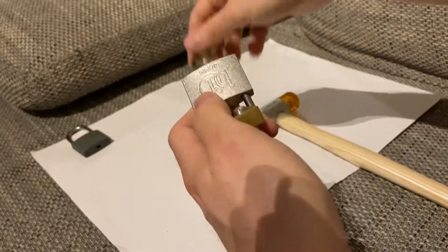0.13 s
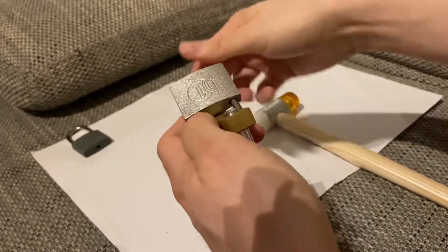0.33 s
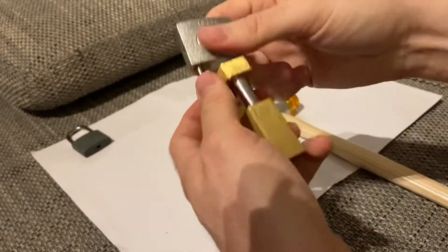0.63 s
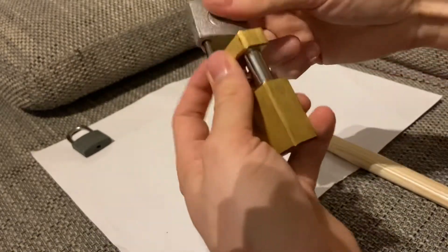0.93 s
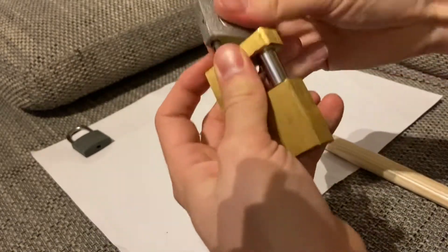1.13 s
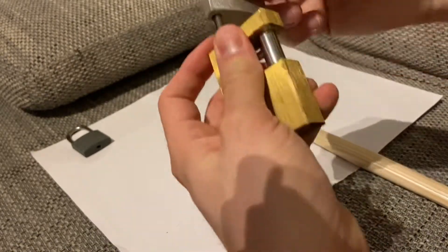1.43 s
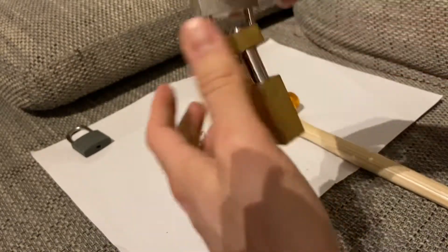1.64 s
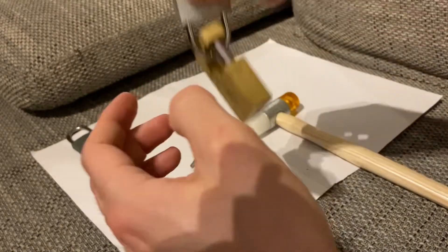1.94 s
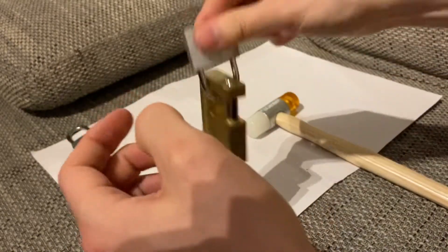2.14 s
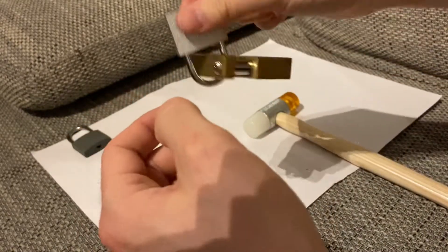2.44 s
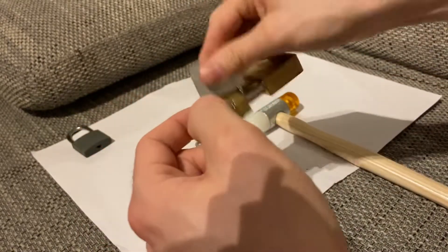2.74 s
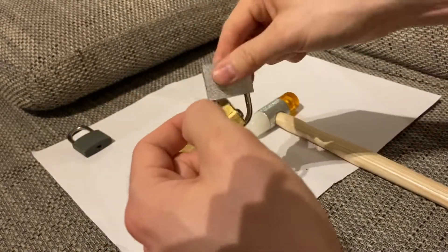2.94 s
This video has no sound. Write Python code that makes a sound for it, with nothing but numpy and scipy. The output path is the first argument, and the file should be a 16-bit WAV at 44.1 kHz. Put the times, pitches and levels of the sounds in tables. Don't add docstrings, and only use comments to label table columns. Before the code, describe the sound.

Linked padlocks are handled over a sofa; a muffled landing and thin jingle, a few dry damped ticks, then sharp irregular shackle clicks. Close stereo microphone, short room tail, faint low rumble.

```python
import sys
import numpy as np
from scipy import signal
from scipy.fft import rfft, irfft, next_fast_len
from scipy.io import wavfile
from scipy.ndimage import map_coordinates

SR = 44100
rng = np.random.default_rng(int(sys.argv[2]) if len(sys.argv) > 2 else 0)


def store_wav(level_fs):
    pcm = np.round(np.clip(np.atleast_2d(level_fs), -1, 1) * 32767)
    wavfile.write(sys.argv[1], SR, pcm.T.astype(np.int16))


def undo_db(level):
    steps = np.asarray(level, float) / 20
    return 10 ** steps


N = 136710


def unit(x):
    return x / np.sqrt(np.mean(x ** 2) + 1e-20)


def along(points, hz):
    f, v = np.transpose(points)
    return np.interp(np.log(hz + 1), np.log(f + 1), v)


def curve(rows):
    return undo_db(np.interp(np.arange(N) / SR, *np.transpose(rows)))


def wobble(rate, size=N):
    knots = rng.standard_normal(int(size * rate / SR) + 4)
    return map_coordinates(knots, [np.arange(size) * rate / SR])


def filtered(x, response):
    m = next_fast_len(x.shape[-1] + 8192)
    spectrum = rfft(x, m) * response(np.fft.rfftfreq(m, 1 / SR))
    return irfft(spectrum, m)[..., :x.shape[-1]]


def noise(colour, size=N):
    return unit(filtered(rng.standard_normal(size), lambda hz: undo_db(along(colour, hz))))


def burst(colour, t, spike):
    crack_t60_s = .004
    push = rng.standard_normal(len(t)) * undo_db(-60 * t / crack_t60_s)
    push[26] += spike
    sound = filtered(push, lambda hz: undo_db(along(colour, hz)))
    return sound / np.abs(sound).max()


def ring(modes, t):
    rattle_db, rattle_rate, rattle_grows_s = 6, 300, .012
    total = np.zeros(len(t))
    for hz, db, t60 in modes:
        rattle = rattle_db * wobble(rattle_rate, size=len(t)) * (1 - np.exp(-t / rattle_grows_s))
        tone = np.sin(2 * np.pi * hz * rng.normal(1, .003) * t)
        total += undo_db(db + rattle - 60 * t / t60) * tone
    return total


def clicks(rows, low, high):
    # frequency in Hz, level in dB
    crack_colour = [(1200, -25), (3000, -13.5), (5000, 2), (7000, 1), (10000, 1), (15500, -2), (16800, -46)]
    knock_colour = [(200, -12.5), (600, -8.5), (1200, -3), (2500, 2.5), (4000, 0.5), (8000, -43)]
    spark_colour = [(7000, -30), (11500, 0), (14000, -1), (16700, -24)]
    spark_db, knock_gain_db, thud_db, scatter_db = -0.5, 5, -1, -5.5
    knock_t60_s, scatter_t60_s, onset_s = .015, .022, .00049
    out = np.zeros((2, N + SR))
    t = np.arange(SR // 4) / SR
    for s, db, knock_db, low_db, high_db in rows:
        spike = np.clip(-.14 * knock_db, 1, 6)
        edge_db = -19 - .29 * knock_db if len(high) else high_db
        edge = 2 * burst(spark_colour, t, spike) * undo_db(spark_db + edge_db)
        thud = noise(knock_colour, size=len(t)) * undo_db(thud_db - 60 * t / knock_t60_s)
        knock = undo_db(knock_db + knock_gain_db) * (2 * burst(knock_colour, t, spike) + thud)
        touch = 2 * burst(crack_colour, t, spike) + edge + knock
        scatter = noise(crack_colour, size=len(t)) * undo_db(scatter_db - 60 * t / scatter_t60_s)
        after = undo_db(low_db) * (scatter + ring(low, t)) + undo_db(high_db) * ring(high, t)
        hit = np.array([touch, after]) * (1 - np.exp(-t / onset_s))
        start = round(s * SR)
        out[:, start:start + len(t)] += undo_db(db) * hit
    return out[:, :N]


def shackles():
    # start in seconds, peak in dB, then
    # knock, body scatter with low ring, and high ring, all three in dB over the crack
    chain_contacts = [
        (1.7479, -15, -18, -23.5, -19),
        (1.751, -23.5, -11.5, -3.5, -32),
        (1.7544, -15.5, -18.5, -3, -9.5),
        (1.7936, -29.5, -33, -9.5, -26),
        (1.8041, -6, -28, -7.5, -5),
        (1.8398, -19.5, -35.5, -20, -23),
                      (2.0181, -25, -13.5, -12, 6.5), (2.022, -17, -40, -15.5, -15), (2.0335, -34, -13, -8, -8),
                (2.0555, -29.5, -30, -25, -15), (2.0608, -26.5, -17, -9, -23),
                (2.0735, -18.5, -26.5, -9, -14), (2.0782, -18, -21.5, -2.5, -3),
                (2.184, -49.5, -1.5, -10, -19), (2.2085, -14, -51.5, -28.5, -34),
                (2.2587, -19, -13.5, -7.5, -30), (2.263, -32.5, -27, -11.5, -29),
                (2.2832, -31.5, -40, -26, -27), (2.3045, -20.5, -11.5, -7, -1.5),
                (2.3462, -18, -54, -19, -9), (2.4057, -15, -19.5, -12, -2), (2.4437, -15.5, -17, -4, -9.5),
                      (2.524, -19.5, -39, -18.5, -14.5), (2.5574, -33.5, -8.5, -4, -18),
                (2.5699, -30.5, -14, -2.5, 5), (2.5734, -27.5, -10.5, -0.5, -6.5),
                (2.595, -8.5, -27, -12.5, -3.5), (2.722, -22, -11.5, -6.5, -16.5),
                (2.7262, -34.5, -18, -4, -14), (2.735, -26, -15, -7.5, -7), (2.7723, -24, -34.5, -18.5, -8),
                (2.8043, -25, -14, -2.5, -15), (2.809, -28, -15, -4.5, -15.5),
                (2.8484, -17.5, -32.5, -16.5, -18), (2.8799, -34.5, -8.5, -23.5, -20.5),
                (3.0241, -38, -20.5, -7.5, -18)]
    # frequency in Hz, level in dB, t60 in seconds
    low = [(4890, -1, .016), (4930, -24, .12), (4760, -6, .012), (5150, -7, .018), (6900, -6, .008),
           (8600, -6, .03), (8640, -24, .15)]
    high = [(13140, -4, .02), (13200, -27, .16), (13050, -28, .1), (11900, -10, .008), (15700, -10, .05)]
    return clicks(chain_contacts, low, high)


def loose_jingle():
    # start in seconds, peak in dB, then knock, body scatter with low ring, and high ring,
    # all three in dB over the crack
    contacts = [(0.0638, -66.5, -29.5, -9.5, -5.5), (0.0931, -40, -36, -5, 1),
                (0.1451, -65, -36.5, 11.5, 7.5), (0.170, -62, -35, 10.5, 6.5), (0.189, -62.5, -37, 8.5, 7),
                (0.2005, -54.5, -32.5, 8.5, 7), (0.2065, -57, -26, 10, 5), (0.2272, -29.5, -0.5, -6.5, -2),
                (0.2484, -38, -12, -2.5, 6), (0.2593, -29, 1, -8, 12.5), (0.2784, -36.5, -16, -6.5, 14.5),
                (0.2994, -43, -16, -1.5, 10.5), (0.332, -33, -28, -6, -2), (0.3821, -49.5, -18, -7.5, -1.5),
                (0.3953, -44.5, -0.5, 4.5, 1), (0.4794, -51.5, -5, -13, -12), (0.6695, -51, -9.5, 1.5, 3)]
    # frequency in Hz, level in dB, t60 in seconds
    low = [(5250, -16, .14), (10200, -20, .12), (7100, -20, .05)]
    high = [(14360, -1, .13), (14680, -8, .08), (14950, -11, .05), (15250, -14, .04), (13900, -14, .04)]
    return clicks(contacts, low, high)


def held_touches():
    # start in seconds, peak in dB, then knock, scatter and bright edge in dB over the crack
    contacts = [(0.5517, -41.5, -22, -4, -37), (0.5699, -22.5, -26.5, -12, -13.5),
                (0.885, -42.5, -21.5, -6.5, -41), (1.061, -64, -35, -22, 9), (1.0827, -86, -23, -11, 1),
                (1.1037, -50, -29, -1, 10), (1.1224, -44.5, -41, -19, -2.5), (1.175, -44, -16, -3, -19),
                (1.3241, -14.5, -36.5, -12, 0), (1.3408, -25, -27.5, -5.5, -14.5), (1.5396, -47, 0, 2, -8),
                (1.5538, -13.5, -48, -12, -9)]
    return clicks(contacts, [], [])


def body_clinks():
    # start in seconds, peak in dB, then knock, scatter with ring, and bright edge,
    # all three in dB over the crack
    contacts = [
        (0.2605, -26, -15.5, 6.5, -28),
        (0.2735, -40, -20, 11, -26.5),
        (0.2805, -33, -20.5, 7.2, -32),
    ]
    # frequency in Hz, level in dB, t60 in seconds
    body = [(4834, 2, .014), (4650, -6, .01), (7100, -10, .01)]
    return clicks(contacts, body, [])


def bumps():
    # start in seconds, level in dB
    landings = [
        (.229, -12.5),
        (0.233, -27.5),
        (0.262, -16),
        (.271, -23.5),
        (.292, -30),
        (0.329, -44),
        (0.396, -36),
        (.668, -46.5),
    ]
    # centre in Hz, width in Hz, level in dB
    cushion = [(94, 49, -4.5), (196.4, 36, 0), (590, 300, -8.5), (1050, 1400, -20)]
    blows = np.zeros(N)
    for s, db in landings:
        blows[round(s * SR)] = undo_db(db + 39.5)

    def body(f):
        total = 0
        for k, (centre, width, db) in enumerate(cushion):
            band = 1j * f * width / (centre * centre - f * f + 1j * f * width)
            total = total + (-1) ** k * undo_db(db) * band
        return total / (1 + 1j * f / 2500)

    return filtered(blows, body)


def grainy(colour):
    return unit(noise(colour) * undo_db(3 * wobble(60) + 3 * wobble(400)))


def paper_rustle():
    # time in seconds, level in dB
    level = [(.04, -84), (.1, -72), (.19, -82.5), (.225, -48.5), (.26, -29), (.31, -45), (.42, -56.5),
             (.55, -71), (.68, -60.5), (.8, -80)]
    # frequency in Hz, level in dB
    colour = [(59, -31.5), (100, 0), (1390, -17.5), (4980, -23), (9610, -21), (14700, -14), (15600, -17),
              (16200, -44)]
    return curve(level) * grainy(colour)


def skin_slide():
    # time in seconds, level in dB
    level = [(1.04, -88), (1.12, -61.5), (1.2, -76), (1.26, -98.5), (1.7, -99), (1.745, -61), (1.76, -82),
             (2.5, -68.5), (2.93, -74.5), (3, -64.5), (3.05, -76)]
    # frequency in Hz, level in dB
    colour = [(150, 2.5), (700, -9.5), (2500, -13.5), (6000, -14), (16000, -34.5)]
    return curve(level) * grainy(colour)


def room(x):
    # frequency in Hz, t60 in seconds
    decay = [(300, 0.39), (5000, 0.42), (14000, 0.33)]
    # frequency in Hz, level in dB
    colour = [(1000, 3.5), (5000, -0.5), (12000, -6.5), (15500, 4.5), (16300, -25)]
    room_db, delay_s = -13.5, .006
    out, step = np.zeros((2, N + SR)), SR // 12
    for start in range(0, N, step):
        hz, t, z = signal.stft(rng.standard_normal((2, SR // 2)), SR, nperseg=256)
        level = along(colour, hz)[:, None] - 60 * t / along(decay, hz)[:, None]
        tail = signal.istft(z * undo_db(level), SR, nperseg=256)[1]
        tail = tail / np.linalg.norm(tail[0])
        wet = signal.fftconvolve(x[None, start:start + step], tail, axes=1)
        out[:, start + round(delay_s * SR):][:, :wet.shape[1]] += wet
    return undo_db(room_db) * out[:, :N]


def background():
    # start in seconds, level in dB
    jolts = [
        (.13, -75),
        (.5, -64.5),
        (.98, -77),
        (1.159, -60),
        (1.329, -56),
        (1.8, -62),
        (2.05, -63),
        (2.277, -58.5),
        (2.58, -66.5),
        (2.8, -67),
    ]
    # frequency in Hz, level in dB
    rumble_colour = [(20, -35), (45, 9), (80, 0), (300, -11), (600, -44)]
    air_colour = [(150, -16.5), (300, 5), (700, -2), (2000, -41.5), (5000, -26), (15300, -5),
                  (16300, -57.5)]
    rumble_db, air_db = -71, -77.5
    hum_hz, hum_db, jolt_hz, jolt_rise_s = 489, -80, 62, .025
    t = np.arange(N) / SR
    hum = undo_db(hum_db + 2 * wobble(10)) * np.sin(2 * np.pi * hum_hz * t)
    grip = np.zeros(N)
    for s, db in jolts:
        u = np.clip(t - s, 0, None) / jolt_rise_s
        grip += undo_db(db) * u * np.exp(1 - u)
    sway = grip * np.sin(2 * np.pi * np.cumsum(jolt_hz * undo_db(wobble(20))) / SR)

    def one():
        air = undo_db(air_db + wobble(1.5)) * noise(air_colour)
        return air + (undo_db(rumble_db) + grip) * undo_db(4 * wobble(10)) * noise(rumble_colour)

    return np.array([one() + hum + sway, one()])


def ports(near, slide, paper, far):
    # frequency in Hz, lead in radians
    lead_points = [(0, 0), (1500, -.2), (3800, -.9), (5200, -1), (6000, 0), (17000, 11.4)]
    # frequency in Hz, level in dB
    lean = [(600, -1.5), (2200, -2), (4500, -5), (6500, -3.5), (7500, 3.5)]
    # frequency in Hz, level in dB
    unrelated = [(100, -13), (700, 0), (2500, 0), (5000, -1), (7000, -20), (8000, -45)]
    paper_start_hz, paper_turn_hz = 5200, 3700
    sign = np.array([[.5], [-.5]])

    def lead(hz):
        return np.interp(hz, *np.transpose(lead_points))

    def snap(u):
        return u - .5 * np.sin(2 * u)

    def close(hz):
        return undo_db(sign * along(lean, hz)) * np.exp(1j * sign * lead(hz))

    def locked(hz, u):
        phase = np.where(hz > 6200, snap(np.minimum(u, 3 * np.pi)), lead(hz))
        return undo_db(sign * along(lean, hz) * (hz < 7500)) * np.exp(1j * sign * phase)

    def diffuse(hz):
        return locked(hz, snap(lead(hz - 150)))

    def below(hz):
        return locked(hz, np.pi * (hz - paper_start_hz) / paper_turn_hz)

    apart = 2 * sign * filtered(far[1], lambda hz: undo_db(along(unrelated, hz)) * diffuse(hz))
    return filtered(near, close) + filtered(paper, below) + filtered(far[0] + slide, diffuse) + apart


def scene():
    jingle_touch, jingle_after = loose_jingle()
    touch, after = shackles() + held_touches() + body_clinks()
    near = touch + jingle_touch + bumps()
    slide = after + skin_slide()
    paper = jingle_after + paper_rustle()
    far = room(near + slide + paper) + background()
    return ports(near, slide, paper, far)


def band_limit(x):
    return signal.sosfilt(signal.butter(12, 16990, fs=SR, output="sos"), x)


def record(dry):
    ceiling, low_hz, top_hz = .8, 36, 16990
    held = dry / (1 + np.abs(dry / ceiling) ** 4) ** (1 / 4)
    mix = filtered(held, lambda hz: (hz < top_hz) * hz ** 2 / (hz ** 2 + low_hz ** 2))
    return band_limit(mix)


dry = scene()
out = record(dry)
store_wav(out)
```